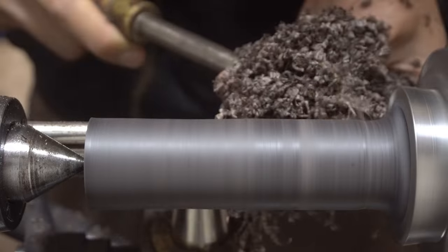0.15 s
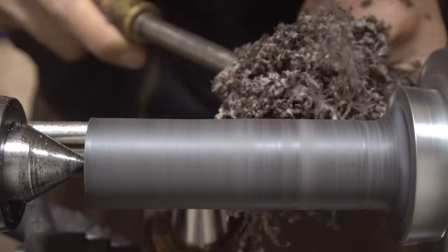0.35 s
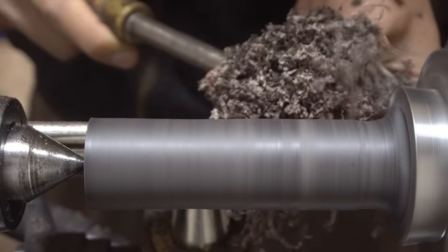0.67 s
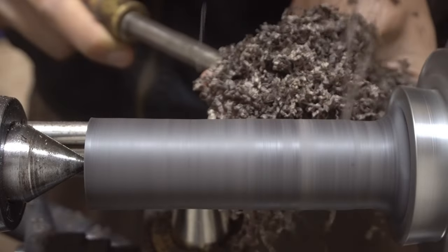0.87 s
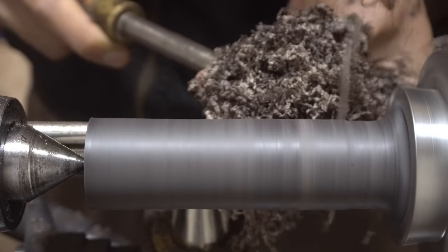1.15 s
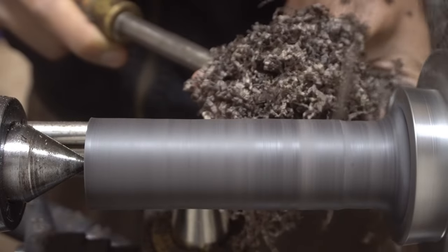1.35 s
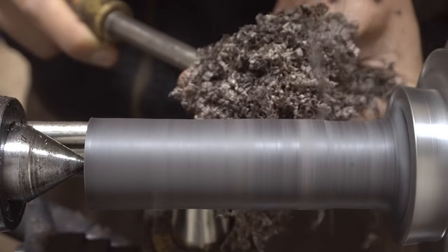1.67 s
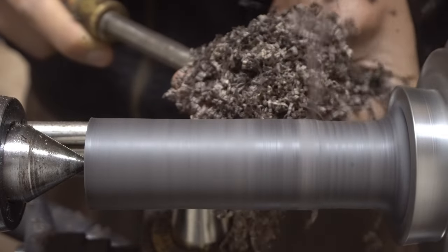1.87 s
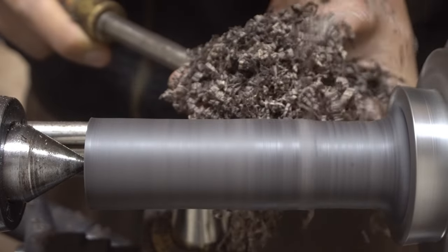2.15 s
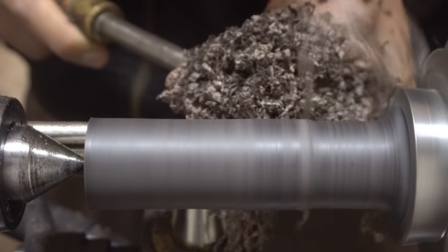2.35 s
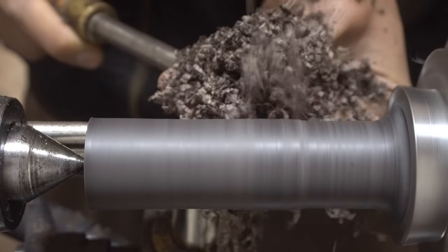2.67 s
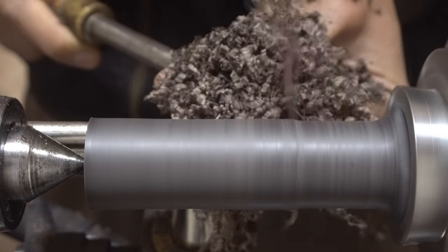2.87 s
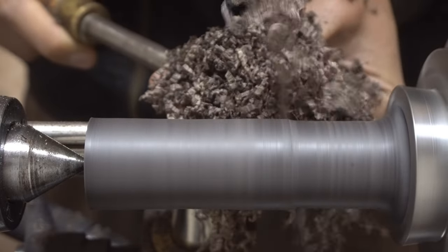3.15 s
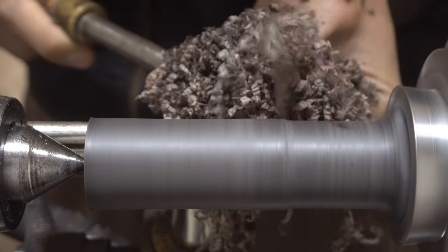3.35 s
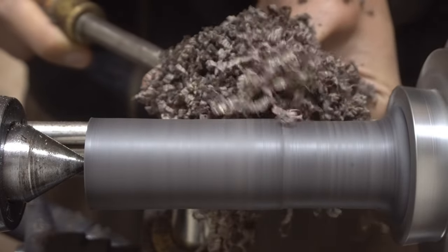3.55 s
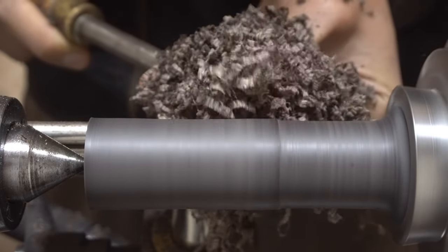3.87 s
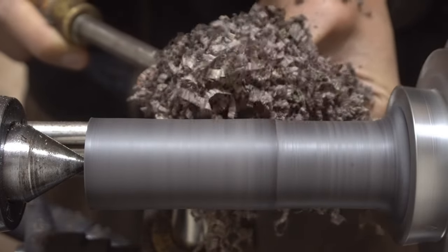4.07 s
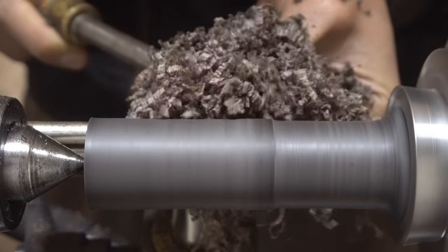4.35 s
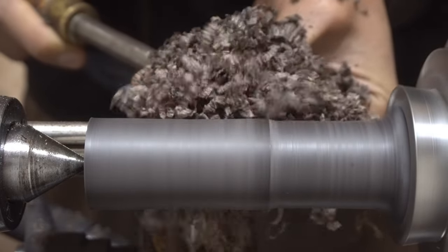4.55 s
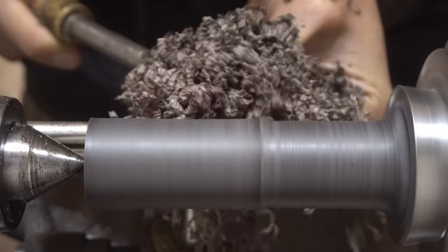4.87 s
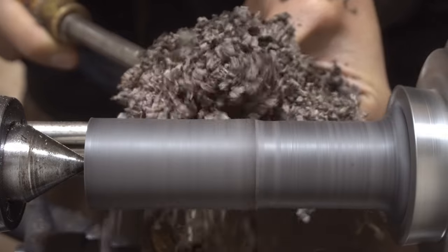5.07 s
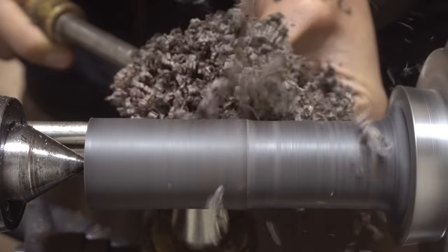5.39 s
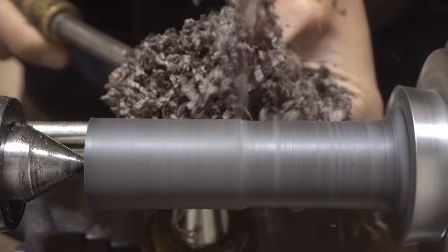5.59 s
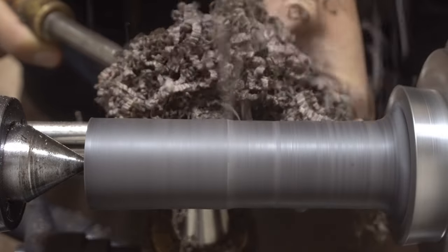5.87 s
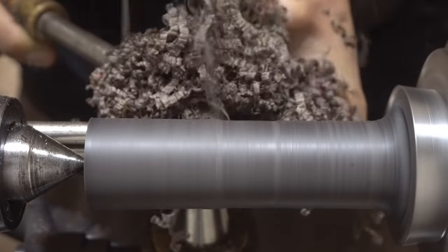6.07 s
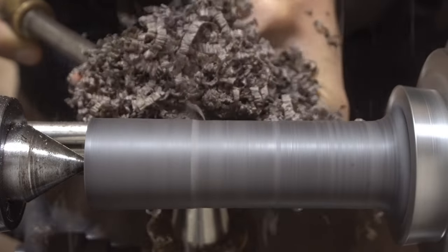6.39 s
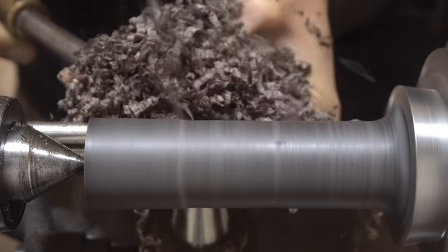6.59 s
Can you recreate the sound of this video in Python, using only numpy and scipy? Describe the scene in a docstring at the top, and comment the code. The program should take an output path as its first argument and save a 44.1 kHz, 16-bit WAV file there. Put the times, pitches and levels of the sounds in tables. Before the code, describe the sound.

Heard from close up, a turning tool peels a spinning cylinder on a workshop lathe. Its high, sizzling hiss comes in right away and holds, with a fine buzz and small uneven swells. Beneath it run a low motor hum, a wavering whine and a rush of air. Past the middle the cut changes tone, then grows rougher, ending with a slight squeal from the tool.

```python
"""A hand-held turning tool peels a cylinder on a small, fast lathe, heard from close by.
From the start the lathe hums and whines, and air and shavings rush round the blank. The edge enters with
a hiss, then rides the groove it left one turn earlier: the hiss repeats and forms a buzzing comb of lines.
Where the shaving tears, the groove is renewed and the buzz turns to rasp. At 4.4 s the hand rolls the tool
steeper, from 5.7 s the edge digs in, and from 6.2 s the shank squeals."""
import sys
import numpy as np
from scipy import signal
from scipy.fft import rfft, irfft
from scipy.io import wavfile
from scipy.ndimage import uniform_filter1d

SR = 44100
rng = np.random.default_rng(int(sys.argv[2]) if len(sys.argv) > 2 else 0)


def master_out(mix):
    """Clip the mix to full scale and print it as 16-bit PCM to the path in sys.argv[1]."""
    frames = np.transpose(np.atleast_2d(mix))
    ceiling = np.clip(frames, -1, 1)
    pcm = np.round(ceiling * 32767).astype(np.int16)
    wavfile.write(sys.argv[1], SR, pcm)


N = 296791
TIME = np.arange(N) / SR
FREQ = np.arange(N // 2 + 1) * SR / N

SPINDLE_HZ, TOP_HZ = 115.58, 15740
STEEPEN_AT_S, STEEPEN_TAKES_S = 4.4, 0.21
DIG_AT_S, DIG_TAKES_S = 5.7, 0.58
# The lathe under load: time_s, bed_hum_db, bench_rumble_db
LOAD = [(0, -49, -44), (.4, -40.5, -53), (.75, -44.5, -50.5), (1.5, -39.5, -55.5), (2.33, -39.5, -54.5),
        (2.6, -47, -52.5), (3.2, -36, -45.5), (3.85, -43, -48.5), (4.55, -39.5, -50.5), (4.92, -47, -50.5),
        (5.08, -39, -49), (5.8, -39.5, -47.5), (6.73, -43, -49)]
# The edge bites deeper or skips: centre_s, half_length_s, rise_db, extra_tear_share
SURGES = [(.57, 0.027, 6, 0.14), (.82, 0.052, 7.5, 0), (1.024, 0.017, 2.5, 0), (1.366, 0.078, 6, 0.23),
          (1.512, 0.024, 5.5, 0.56), (1.669, 0.034, 5, 0.03), (1.78, .025, -4.5, 0.04),
          (1.857, 0.034, 6, 0.12), (2.168, 0.011, 3, 0.5), (2.28, 0.037, -2.5, 0.03),
          (2.513, 0.021, 8, .35), (3.70, 0.012, 4, 0.4), (4.102, 0.039, 2, 0.03), (4.243, 0.024, 1, 0.6),
          (4.385, 0.017, 2, 0.6), (4.466, 0.02, -2.5, .35), (4.584, 0.042, 5, 0), (4.665, 0.032, 5, 0),
          (4.739, 0.035, 6, 0.63), (4.794, 0.024, -4.5, 0), (5.827, 0.035, 3.5, 0.4), (6.07, 0.016, 1.5, 0),
          (6.116, 0.027, -7.5, 0.15), (6.197, 0.086, 4, 0.3), (6.454, 0.023, 6, 0)]


def undb(db):
    """Decibels to amplitude ratio."""
    return 10 ** (np.asarray(db) / 20)


def unit(x):
    """Normalisation to rms 1."""
    return x / np.sqrt(np.mean(x ** 2))


def even_out(x, size):
    """Normalisation by the running rms over size samples."""
    return x / np.sqrt(uniform_filter1d(x ** 2, size=size))


def controls(table, times):
    """Linear interpolation of each column against the first."""
    time_s, *columns = np.transpose(table)
    return [np.interp(times, time_s, column) for column in columns]


def ramp(times, start, length):
    """Linear rise from 0 to 1."""
    return np.clip((times - start) / length, 0, 1)


def swells(times, events):
    """Sum of Gaussian swells: centre_s, half_length_s, height."""
    return sum(height * np.exp(-((times - s) / length) ** 2) for s, length, height in events)


def shape(x, gain):
    """Filtering as multiplication of the spectrum by a gain."""
    return irfft(rfft(x) * gain, N)


def above(hz):
    """Gain of a steep high-pass."""
    return 1 / (1 + (hz / (FREQ + 1)) ** 40)


def walk(rate_hz):
    """Low-passed noise: a smooth random drift of rms 1."""
    return unit(shape(rng.standard_normal(N), 1 / (1 + (FREQ / rate_hz) ** 2)))


def ring(x, modes, contrast=1):
    """Forced resonance, scaled to rms 1: modes add in power; contrast under 1 fills the valleys."""
    power = sum(undb(db) ** 2 / (1 + ((FREQ - hz) / width) ** 2) ** 2 for hz, width, db in modes)
    return unit(shape(x, np.sqrt(power) ** contrast))


def rush():
    """Broadband flow noise: air and shavings round the blank, following the rumble slightly."""
    # Spectrum of the rush: frequency_hz, relative_density_db
    spectrum = [(30, -28), (200, 7), (400, -2.5), (500, -1), (780, 1.5), (1100, -3), (1260, 0.5),
                (1430, -5), (1680, -3.5), (2000, -4.5), (2600, -1.5), (3400, 0.5), (4500, -2.5),
                (9000, -1.5), (15000, -6)]
    # Heaped shavings tumble against the blank: centre_s, half_length_s, rise_db
    tumbles = [(3.266, 0.33, 2.5)]
    hz, db = np.transpose(spectrum)
    colour = undb(np.interp(np.log(FREQ + 1), np.log(hz), db))
    _, rumble_db = controls(LOAD, TIME)
    usual_rush_db, usual_rumble_db = -38.5, -50
    level_db = usual_rush_db + 0.15 * (rumble_db - usual_rumble_db) + swells(TIME, tumbles)
    return unit(shape(rng.standard_normal(N), colour)) * undb(level_db)


def hum():
    """Structural resonance: fed evenly by the drive, bed and bench throb in their close modes."""
    # Resonances of bed and of bench: pitch_hz, half_width_hz, weight_db
    bed_modes = [(104, 14, -19.5), (149.5, 7.8, -10), (177, 6.5, -1), (186.7, 3.5, 2.5), (195, 3.8, -25),
                 (207.8, 1.7, -15.5), (225.3, 16, -20.5), (312, 11.4, -19)]
    bench_modes = [(58.4, 6.1, 2.5), (79, 15, -1), (109, 14, -3.5)]
    # Thumps in the bed: centre_s, half_length_s, rise_db
    thumps = [(0.268, 0.029, 11), (4.56, 0.031, 4), (5.19, 0.044, 3), (6.164, 0.03, 5.5)]
    hum_db, rumble_db = controls(LOAD, TIME)
    bed = even_out(ring(rng.standard_normal(N), bed_modes), size=5000)
    bench = even_out(ring(rng.standard_normal(N), bench_modes), size=5000)
    return bed * undb(hum_db + swells(TIME, thumps)) + bench * undb(rumble_db)


def drone():
    """Amplitude and phase modulation: a low tone of the drive wavers as it sags and fades."""
    # Course of the drone: time_s, pitch_hz, level_db
    course = [(0, 247.7, -49), (1.3, 237.3, -44), (2.1, 235.2, -51.5), (4.8, 237.6, -52.5),
              (6.73, 237.6, -70)]
    pitch_hz, level_db = controls(course, TIME)
    phase = 2 * np.pi * np.cumsum(pitch_hz) / SR
    return undb(level_db + 2 * walk(3.3)) * np.sin(phase + 1.14 * walk(1.8))


def whine():
    """Line spectrum of rotating parts: spindle harmonics and drive tones, each wavering a little."""
    # Spindle and bearings: harmonic_number, level_db
    spindle_lines = [(4, -62), (8, -64.5), (9, -60), (12, -66.5), (13, -65.5), (14, -58), (15, -55.5),
                     (16, -58), (19, -63.5), (20, -65), (21, -59.5), (24, -61), (29, -82)]
    # Motor and drive: pitch_hz, level_db
    drive_lines = [(1211, -58), (1258, -55), (1271, -58), (1346, -56), (1683, -66.5), (2890, -60.5),
                   (2928, -62), (3097, -54), (3121, -69), (3366, -50.5), (3396, -57), (4336, -57.5)]
    tones = [(round(k) * SPINDLE_HZ, db) for k, db in spindle_lines] + drive_lines
    out, trim_db = 0, -0.5
    for hz, db in tones:
        amplitude = np.sqrt(2) * undb(db + trim_db + 4.0 * walk(2.65))
        out = out + amplitude * np.sin(2 * np.pi * hz * TIME + 0.84 * walk(4.6))
    return out * ramp(TIME, 0, 0.099)  # they rise as the tool takes hold


def tearing(times):
    """Loss of coherence: the share of groove renewed per turn, low in a clean cut."""
    entry = 0.29 * np.exp(-times / 0.28)  # the edge settles into a groove
    steepening = 0.1 * ramp(times, STEEPEN_AT_S, STEEPEN_TAKES_S)
    digging = 0.18 * ramp(times, DIG_AT_S, DIG_TAKES_S)
    catches = swells(times, [(s, length, tear) for s, length, _, tear in SURGES])
    return np.clip(0.076 + entry + steepening + digging + catches, 0.02, 0.95)


def groove(wear_slope=1.27, points=1024, orders=140):
    """Regeneration: each turn keeps most of the last one's roughness, losing fine ripples first."""
    # Ripples that lock in and sing: start_s, end_s, ripples_per_turn, prominence_db
    singing = [(.35, 1.6, 29, 7), (.35, 1.45, 78, 4.5), (.45, 1.3, 74, 5), (.4, 2.5, 60, 2.5),
               (.4, 1.57, 52, 2.5), (1.4, 2.4, 53, 6), (1.5, 2.3, 31, 6), (1.6, 2.3, 58, 6),
               (1.6, 3.0, 36, 7), (1.87, 3.3, 52, 4), (2.0, 2.6, 102, 7), (2.57, 3.7, 35, 7.5),
               (3.3, 3.9, 53, 3.5), (3.1, 5.45, 79, 3.5), (3.73, 4.45, 112, 7), (3.76, 4.73, 100, 6),
               (4.5, 5.5, 90, 4), (4.8, 5.35, 50, 8), (4.8, 6.5, 36, 4), (5.7, 6.5, 47, 5),
               (6.5, 6.9, 32, 5)]
    lock_takes_s, singing_boost_db = 0.3, 1
    turns = np.arange(int(N / SR * SPINDLE_HZ) + 2)
    times = turns / SPINDLE_HZ
    tear = tearing(times)
    fineness = np.arange(orders) / orders
    kept = (1 - tear[:, None]) ** (fineness ** wear_slope)
    ripples = rng.standard_normal((len(turns), orders, 2)) @ np.array([1, 1j])
    for turn in turns[1:]:
        ripples[turn] = kept[turn] * ripples[turn - 1] + np.sqrt(1 - kept[turn] ** 2) * ripples[turn]
    # the edge planes down ripples that stay tall
    ripples = ripples / np.sqrt(uniform_filter1d(np.abs(ripples) ** 2, size=50, axis=0))
    # near a resonance the vibrating edge recuts its own ripple, which holds until the shaving tears
    for start, end, order, db in singing:
        inside_s = np.minimum(times - start, end - times)
        lock = np.clip(inside_s / lock_takes_s + 0.5, 0, 1) * (1 - tear ** 2)
        drift = np.exp(1j * np.cumsum(0.171 * rng.standard_normal(len(turns))))
        locked = undb(db + singing_boost_db) * drift
        ripples[:, round(order)] += lock * (locked - ripples[:, round(order)])
    surface = irfft(ripples, points, axis=1).ravel()
    return unit(np.interp(TIME * SPINDLE_HZ * points, np.arange(len(surface)), surface))


def bite(harmonics=7):
    """Periodic modulation: hard and soft patches pass once a turn, shifting as the tool travels."""
    angle = 2 * np.pi * SPINDLE_HZ * TIME
    return unit(sum(np.cos(k * angle + 1.5 * walk(0.6)) / k ** 0.25 for k in range(1, harmonics + 1)))


def tool(force, squeal):
    """Modal response of tool and blank: the angle of the edge picks the resonances."""
    # Resonances with the edge held shallow and held steep: pitch_hz, half_width_hz, weight_db
    shallow_modes = [(3387, 70, -6.6), (3413, 530, -15.3), (3533, 70, -8.7), (4097, 140, -10.6),
                     (5532, 1040, -13.3), (5584, 70, -6.6), (6068, 70, 1.2), (6678, 70, -8.1),
                     (6940, 90, -6.1), (7638, 310, -8.2), (8147, 160, -8.7), (8582, 130, -3.6),
                     (9024, 210, -1.3), (10121, 1330, -12.0), (11266, 70, 0.9), (11526, 100, -3.0),
                     (11849, 420, -1.4), (12870, 140, -1.5), (13387, 220, -6.3), (13933, 130, -1.8),
                     (14477, 170, -2.2), (15097, 500, -0.8)]
    steep_modes = [(3909, 710, -11.7), (4144, 70, -6.8), (5512, 230, -7.8), (5767, 70, -10.4),
                   (6052, 110, -7.1), (7018, 140, -9.0), (7103, 1480, -12.3), (8073, 110, -10.0),
                   (9097, 70, -3.9), (9132, 950, -11.4), (10486, 350, -7.9), (11634, 430, -16.3),
                   (12898, 100, -8.0), (13150, 1140, -11.5), (14520, 70, -0.1), (15071, 70, -1.9),
                   (15391, 70, -0.8), (15442, 1500, -6.3)]
    # Emphasis of the highest treble: time_s, relative_lift_db
    treble_lift = [(0, 3), (.95, -5), (1.8, 0), (4.7, 5.5), (5.7, -2), (6.73, 2.5)]
    steep = ramp(TIME, STEEPEN_AT_S, STEEPEN_TAKES_S)
    sound = np.sqrt(1 - steep) * ring(force, shallow_modes, contrast=0.84)
    sound += np.sqrt(steep) * ring(force, steep_modes, contrast=0.89)
    sound += undb(-6) * squeal ** 2 * ring(force, [(3900, 240, 0)])  # the shank's squealing mode
    lift_db, = controls(treble_lift, TIME)
    return sound + (undb(lift_db) - 1) * shape(sound, above(13500))


def flutter(x, depth_db=1.3, rate_hz=26, spread_hz=260):
    """Varying damping: the curling shaving damps one group of resonances after another."""
    hz, s, spectra = signal.stft(x, SR, nperseg=512, noverlap=384)
    across_pitch = np.exp(-(np.subtract.outer(hz, hz) / spread_hz) ** 2)
    across_time = np.exp(-(np.subtract.outer(s, s) * rate_hz) ** 2)
    patches = unit(across_pitch @ rng.standard_normal(spectra.shape) @ across_time)
    return signal.istft(spectra * undb(depth_db * patches), SR, nperseg=512, noverlap=384)[1][:N]


def chatter(cut_db, squeal):
    """Forced vibration of the shank, in dB: it builds up, follows the cut and grows with strain."""
    usual_chatter_db, usual_cut_db = -39, -29
    build_db = -4 * (1 - ramp(TIME, 0, 2.8))
    strain_db = 3.5 * tearing(TIME) + 1.5 * ramp(TIME, DIG_AT_S, DIG_TAKES_S) + 6.5 * squeal
    return usual_chatter_db + 0.69 * (cut_db - usual_cut_db) + build_db + strain_db


def cut():
    """Source and filter: groove and crumbling chips shake the tool; pressure sets each band's level."""
    # Push of the hand: time_s, cut_db, sizzle_over_cut_db
    feed = [(0, -50, -12), (.075, -45, 0), (.13, -35, 4.5), (.31, -35, 2.5), (.355, -29.5, 2.5),
            (.95, -28.5, 2.5), (1.6, -27, 3), (2.04, -29, 6.5), (2.15, -32.5, 7), (2.7, -28.5, 4.5),
            (3.45, -29, 3.5), (3.9, -33, 4), (4.48, -33.5, 7.5), (4.9, -30, 3.5), (5.9, -28, -0.5),
            (6.35, -29.5, 2.5), (6.73, -26.5, 1.5)]
    feed_db, sizzle_over_cut_db = controls(feed, TIME)
    surge_db = swells(TIME, [(s, length, db) for s, length, db, _ in SURGES])
    cut_db = feed_db + surge_db
    sizzle_db = cut_db + sizzle_over_cut_db - 0.21 * surge_db  # a thicker shaving sizzles less
    squeal = ramp(TIME, start=6.2, length=0.68)
    crumbs = undb(-12 + 1.2 * walk(300)) * rng.standard_normal(N)
    force = (groove() + crumbs) * undb(1.88 * bite())
    sound = flutter(tool(force, squeal))
    out = shape(sound, 1 - above(2700)) * undb(cut_db - 10.5)
    bands = [(above(2700) - above(4800), chatter(cut_db, squeal)),
             (above(4800) - above(11000), cut_db),
             (above(11000), sizzle_db)]
    for band, db in bands:
        out += even_out(shape(sound, band * (FREQ < TOP_HZ)), size=6000) * undb(db)
    return out * undb(0.92 * walk(12))  # the hand is never quite steady


def scene():
    """Superposition of cut and machine at one close point."""
    return (cut() + whine() + hum() + drone() + rush())[None]


def record(dry):
    """Band limiting: a steep low-pass removes the highest treble."""
    return shape(dry, 1 / np.sqrt(1 + np.minimum(FREQ / TOP_HZ, 1.1) ** 600))


dry = scene()
out = record(dry)
master_out(out)
```